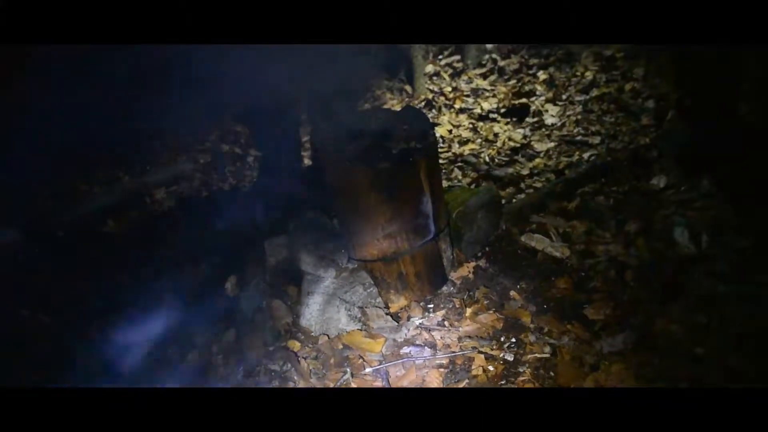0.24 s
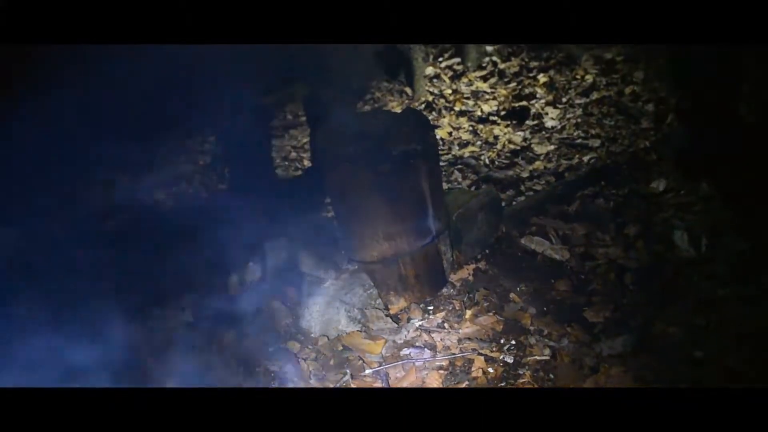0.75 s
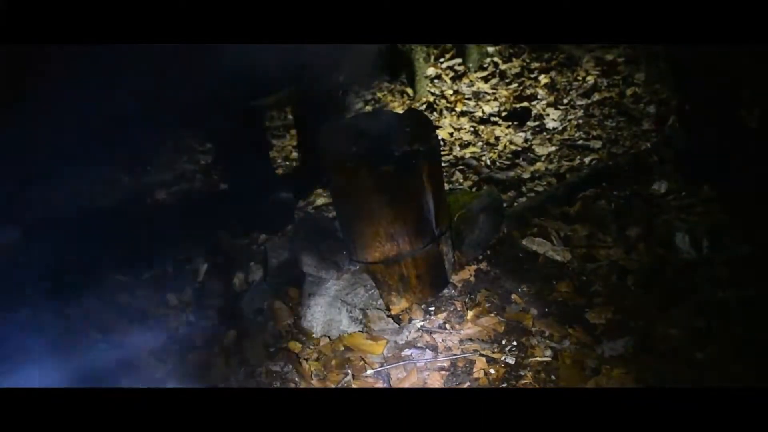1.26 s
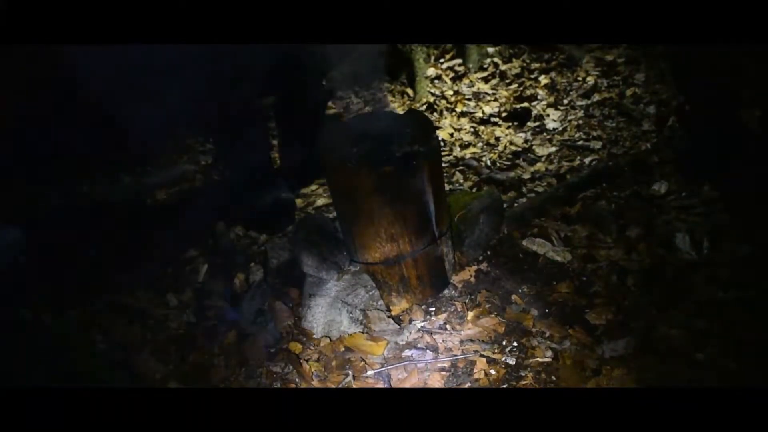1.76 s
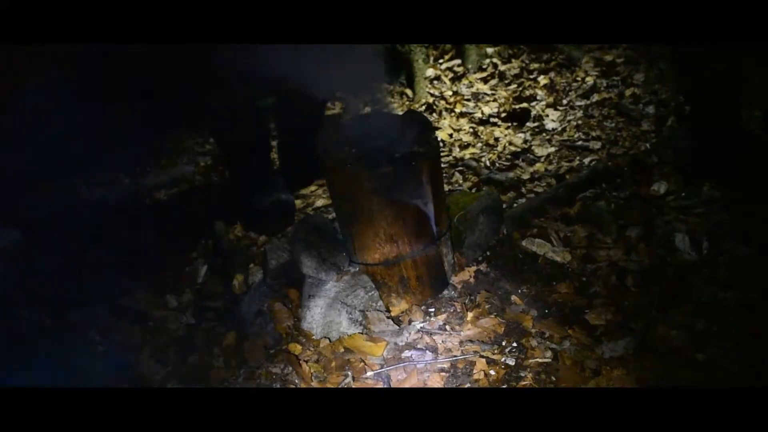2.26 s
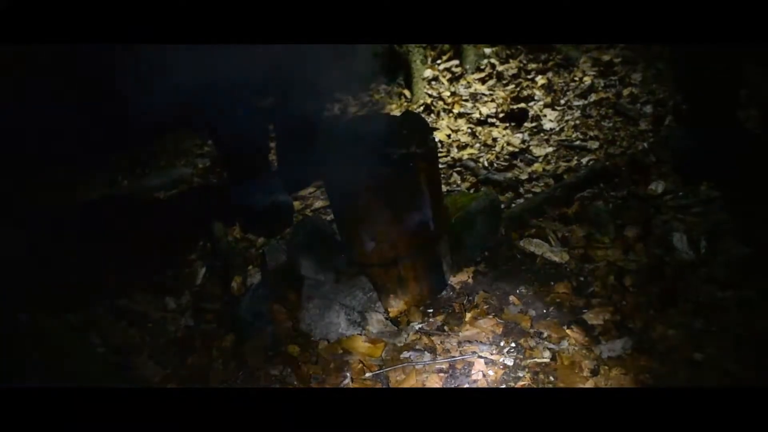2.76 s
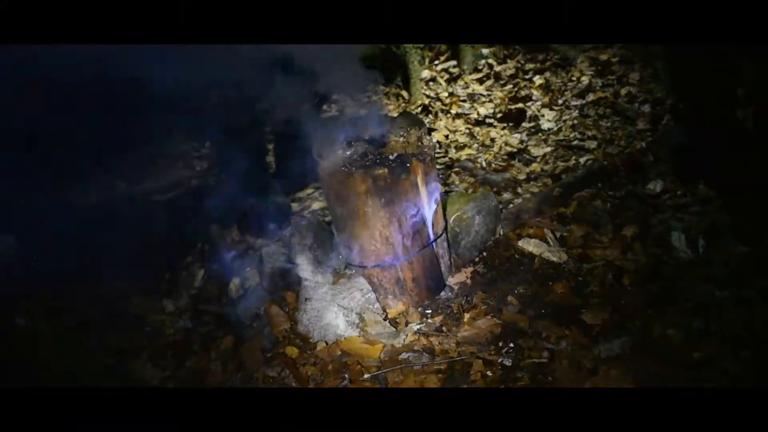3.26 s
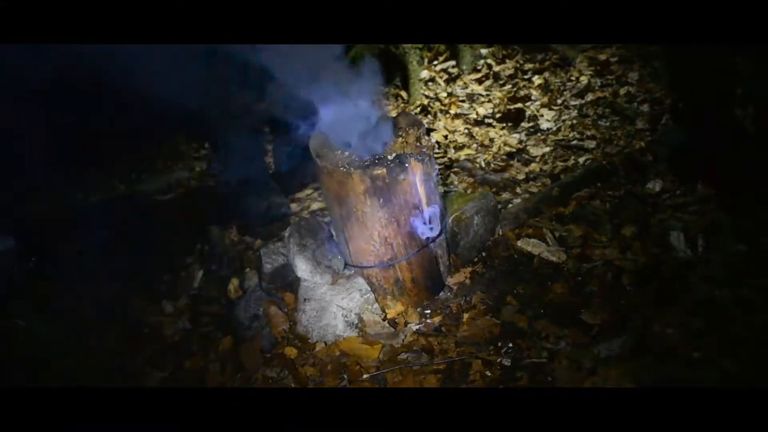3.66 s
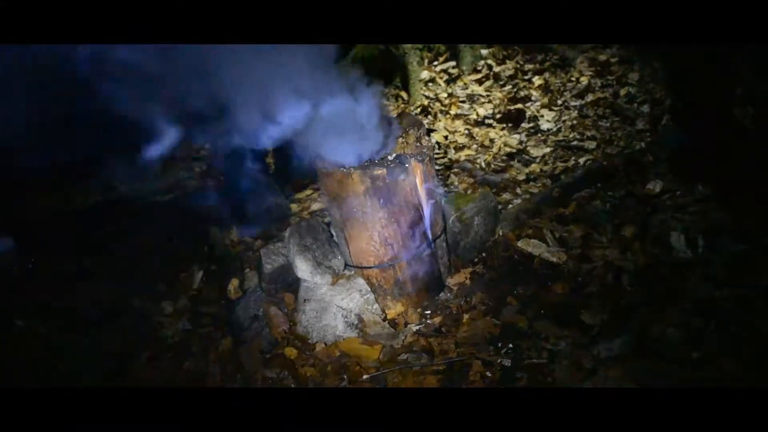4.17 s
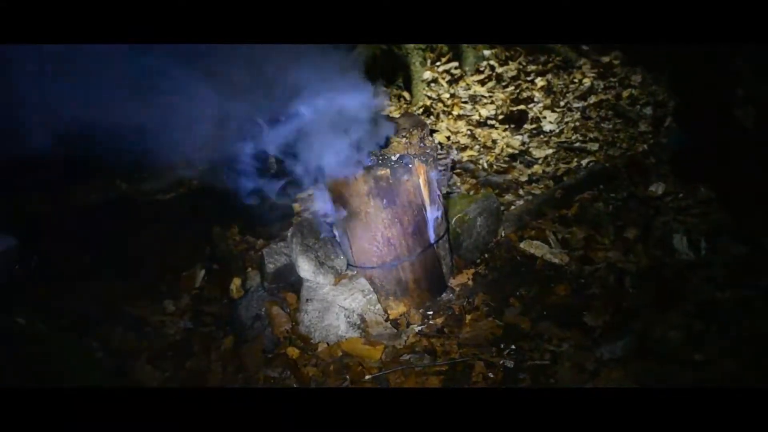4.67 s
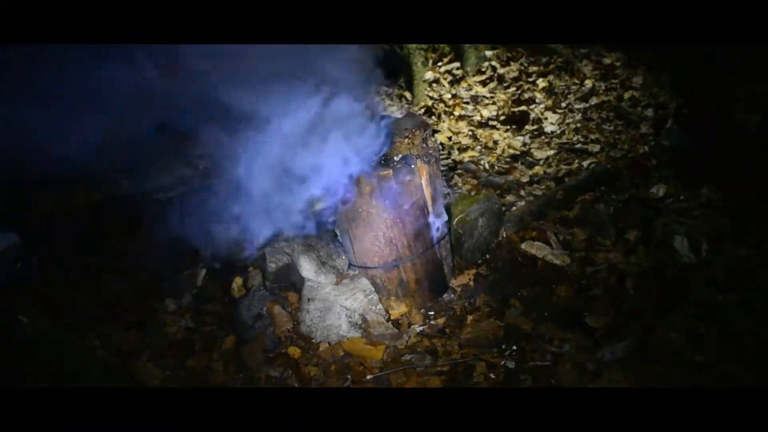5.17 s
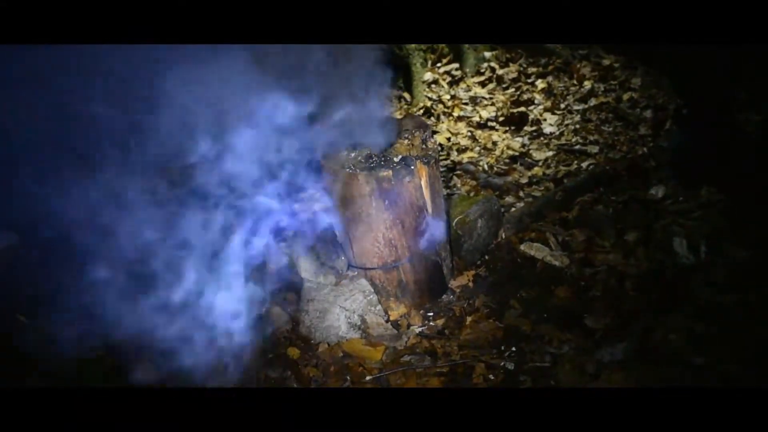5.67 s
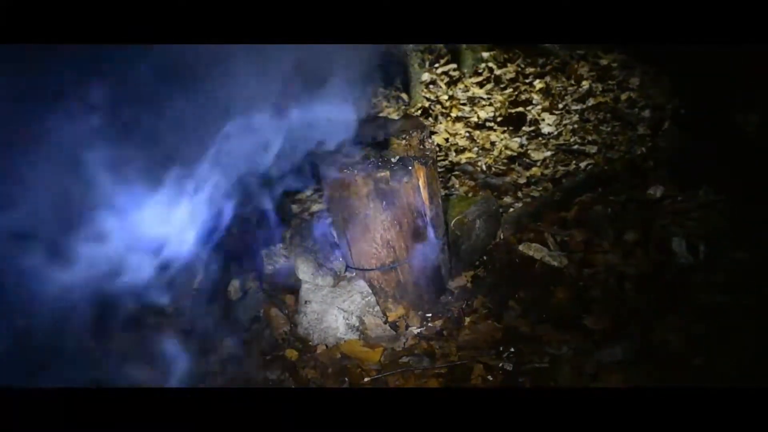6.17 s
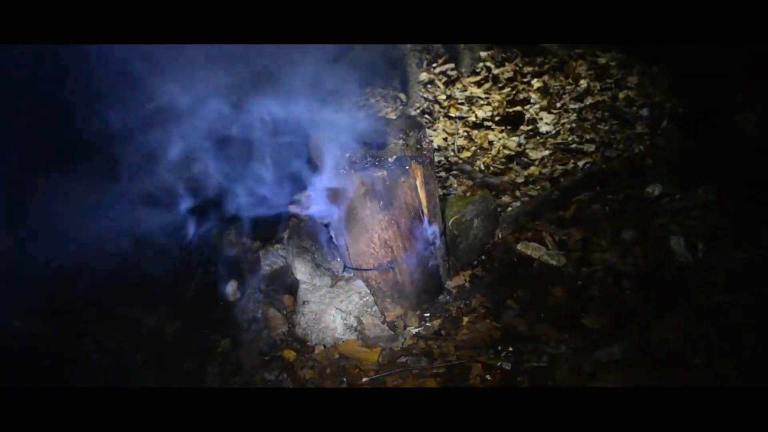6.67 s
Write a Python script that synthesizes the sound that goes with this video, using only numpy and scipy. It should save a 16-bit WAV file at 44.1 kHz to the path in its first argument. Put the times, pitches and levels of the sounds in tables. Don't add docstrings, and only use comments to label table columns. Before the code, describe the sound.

A damp log smoulders at night, very close, slightly left of centre in dry open air. Thin steam hiss and low ember flutter continue throughout, with quiet night air beneath. A small dull wet pop comes at 0.4 s, then a huge, bright, crackling burst at 1.04 s with tiny snaps trailing and a puff of hiss. After faint snaps around 1.3 s it calms. From 2.35 to 2.5 s a dense flurry of hollow woody crackles rings around mid pitch; a hard snap follows at 2.77 s. From 3 to 4.8 s only faint ticks, breathy whistling and gently swelling steam. At 4.99 s a short throbbing jet cracks open, then very sharp cracks at 5.19, 5.24 and 5.28 s, and a lighter one at 5.68 s. Fine ticks continue; crackles at 6.35 s and clustered bright pops from 6.47 to 6.9 s close it.

```python
import sys
import numpy as np
from scipy import signal
from scipy.io import wavfile
from scipy.ndimage import uniform_filter1d

SR = 44100
rng = np.random.default_rng(int(sys.argv[2]) if len(sys.argv) > 2 else 0)


def magnitude_from_level(level_db):
    exponent = np.asarray(level_db, float) / 20
    return 10 ** exponent


def waveform_to_disk(signal):
    frames = np.transpose(np.atleast_2d(signal))
    scaled = np.clip(frames, -1, 1) * 32767
    samples = np.round(scaled).astype(np.int16)
    wavfile.write(sys.argv[1], SR, samples)


N = 305337
LOG_PAN_DB = -1.42

ZONES_HZ = [300, 2200, 7000, 16500]


def rms_one(x):
    return x / np.sqrt(np.mean(x ** 2) + 1e-20)


def at_hz(points, hz):
    table_hz, table_db = np.transpose(points)
    return np.interp(np.log(hz), np.log(table_hz), table_db)


def drift(rate, size=N):
    knots = rng.standard_normal(4000)
    return np.interp(np.arange(size) * rate / SR, np.arange(len(knots)), knots)


def fade(t, dying_s):
    return magnitude_from_level(-60 * t / dying_s)


def band(x, low_hz, high_hz):
    sos = signal.butter(2, [low_hz, min(high_hz, .45 * SR)], "band", fs=SR, output="sos")
    return signal.sosfilt(sos, x)


def resonance(x, hz, width_hz):
    r = np.exp(-np.pi * width_hz / SR)
    feedback = [1, -2 * r * np.cos(2 * np.pi * hz / SR), r * r]
    return signal.lfilter([(1 - r * r) / 2, 0, (r * r - 1) / 2], feedback, x)


def twice_resonance(x, hz, width_hz):
    return resonance(resonance(x, hz, width_hz), hz, width_hz)


def panned(x, pan_db):
    return x * magnitude_from_level([[pan_db / 2], [-pan_db / 2]])


def pair(mid, side, alike, pan_db):
    own = np.sqrt(1 - alike) * side * [[1], [-1]]
    return panned(np.sqrt(alike) * mid + own, pan_db)


def gust(start, length, rise):
    u = np.clip((np.arange(N) / SR - start) / length, 0, 1)
    return np.sin(np.pi * u ** rise) ** 2


# start in seconds, snap level in dB, pocket pitch in Hz,
# dying time in ms, ring over the snap in dB.
BLASTS = [
    (1.0423, -5, 3200, 12.6, -27),
    (2.7667, -5, 6430, 10, -31),
    (2.767, -29, 1830, 9.5, -3),
    (5.1914, -6.5, 6500, 13, -7),
    (5.196, -15.5, 3740, 15, -9),
    (5.284, -9.5, 5470, 6.3, -18),
    (5.288, -16.5, 5200, 16.6, -5),
    (6.5961, -23.5, 6250, 9.1, -4),
    (6.641, -23, 3860, 9.4, -12),
]


def blasts():
    return [(s, hz, db + ring_db, db - 17, db, ms) for s, db, hz, ms, ring_db in BLASTS]


# start in seconds, snap level in dB, pocket pitch in Hz, dying time in ms.
SNAPS = [(1.056, -41.5, 5530, 8), (1.065, -38, 2970, 7), (1.0717, -25, 4690, 10), (1.0754, -32, 4570, 10),
         (1.08, -31, 6550, 14), (1.0887, -33, 5790, 22), (1.279, -27.5, 6300, 6), (1.3005, -30.5, 6800, 8),
         (2.3809, -23, 2070, 28), (2.3881, -18, 2500, 8.9), (2.5028, -33, 3520, 21),
         (2.7726, -16, 6500, 18), (2.7817, -22, 6740, 10), (2.788, -23, 5600, 7.4), (2.793, -32, 6960, 37),
         (3.355, -35.5, 1870, 7.1), (3.619, -28.5, 1770, 4.1), (5.2363, -21.5, 4490, 4),
         (5.24, -30, 2110, 33), (5.437, -37.5, 6480, 27), (5.4991, -37.5, 5750, 21),
         (5.6688, -40, 5470, 46), (5.684, -16.5, 6650, 3), (5.6865, -27.5, 7000, 13.3),
         (5.885, -52, 6500, 10), (6.861, -29.5, 2400, 10), (6.8648, -30, 4000, 7.1)]


def snaps():
    return [(s, hz, db - 14.5, db - 18.5, db, ms) for s, db, hz, ms in SNAPS]


# start in seconds, ring level in dB, pocket pitch in Hz, snap over the ring in dB.
POPS = [(0.4091, -35, 630, -0.5), (2.165, -53, 1680, -8), (2.345, -44, 900, -14), (2.376, -34, 2850, -4),
        (2.3963, -39.5, 3150, 0), (2.403, -37, 3180, -5), (2.421, -31, 2900, 9), (2.424, -23, 2810, 3.5),
        (2.441, -42, 2510, -6), (2.4482, -30.5, 2320, 1.5), (2.4717, -40, 2170, -16),
        (2.5333, -48.5, 2610, -5.5), (2.591, -41.5, 2210, -14), (2.6605, -40, 2600, -20),
        (2.775, -34, 6860, -10), (4.7716, -45, 4200, -1), (4.879, -43, 2780, -6), (5.519, -44.5, 1150, 3),
        (5.7064, -50.5, 1230, -15), (5.712, -48, 590, -20), (5.742, -51, 1290, -12),
        (6.4669, -32.5, 6300, -0.5), (6.488, -35, 6130, 1), (6.5458, -39, 1550, -6),
        (6.6146, -32, 4660, 4.5), (6.622, -39.5, 2280, -5), (6.7108, -30.5, 4060, -7.5),
        (6.866, -31, 1470, -13), (6.871, -36, 4670, -19), (6.8766, -34.5, 3500, -3.5)]


def wet_pops():
    return [(s, hz, db, db - 5.5, db + over_db, min(1000 * 67 / hz, 79)) for s, db, hz, over_db in POPS]


# start in seconds, bark level in dB, pocket pitch in Hz, dying time in ms.
CRACKS = [(0.4162, -30, 2820, 7), (2.022, -45.5, 1690, 19), (2.3694, -41, 1190, 16), (2.3716, -42, 655, 18),
          (2.4047, -31.5, 1780, 34), (2.4103, -39, 3220, 37), (2.417, -31, 2810, 140),
          (2.6528, -34, 2620, 21), (2.7519, -32, 1500, 9.6), (3.106, -46.5, 1145, 32),
          (3.1302, -45, 370, 34), (3.4486, -48, 3880, 20), (3.499, -47.5, 3730, 28),
          (3.5196, -45, 3830, 28), (3.6321, -46, 2620, 18), (4.8592, -43.5, 5840, 25),
          (4.899, -42.5, 3480, 14), (5.7846, -47, 3620, 18), (5.817, -37.5, 4030, 13),
          (6.0353, -40.5, 4520, 8.9), (6.3506, -53, 557, 22), (6.3648, -34.5, 1920, 22),
          (6.3687, -39, 2020, 56), (6.4417, -44.5, 6100, 18), (6.494, -36.5, 6640, 4.8),
          (6.5826, -47, 1720, 30), (6.834, -31.5, 4500, 6.3), (6.8512, -40, 6420, 9.1),
          (6.8965, -46, 5260, 34)]


def bark_cracks():
    return [(s, hz, db - 1.5, db, db + 3.5, ms) for s, db, hz, ms in CRACKS]


# start in seconds, ring level in dB, pocket pitch in Hz.
TICKS = [(1.136, -40, 7650), (1.39, -49.5, 1500), (2.377, -32, 2900), (2.422, -38, 433),
         (2.4247, -30, 2920), (2.417, -38, 2600), (2.504, -41, 3400), (2.55, -43, 1310),
         (2.6305, -41, 1760), (2.6479, -36, 1320), (3.614, -45, 1260), (4.865, -41.5, 2720),
         (4.8831, -60, 1490), (4.93, -48, 6500), (4.982, -44, 2800), (5.69, -46, 796), (5.724, -46.5, 450),
         (5.795, -51, 6200), (5.818, -39, 2620), (6.366, -52, 554), (6.588, -39, 4500), (6.5964, -37, 2400),
         (6.6176, -43, 6500), (6.7123, -60.5, 1340), (6.736, -49, 4200), (6.762, -50, 2400),
         (6.8413, -43, 4610), (6.8743, -39, 4840), (2.372, -32, 9000), (2.3767, -30, 8750),
         (2.39, -42, 11000), (2.4395, -43, 9500), (6.5951, -29.5, 8520), (6.618, -33, 6000),
         (6.512, -47, 6000), (6.828, -48, 2500), (6.351, -39, 1890), (6.691, -54, 2000),
         (5.197, -28.5, 9500), (4.94, -48, 7000), (4.89, -46, 7500)]


def ticks():
    return [(s, hz, db, db - 10, db - 2.5, 23) for s, db, hz in TICKS]


APART_DB = [-3.5, -0.5, 4.5]


def pops():
    events = blasts() + snaps() + wet_pops() + bark_cracks() + ticks()
    at, pocket_hz, pocket_db, bark_db, snap_db, dying_ms = np.transpose(events)[:, :, None]
    dying_s = dying_ms / 1000
    t = np.arange(2600) / SR
    mid, side = rng.standard_normal((2, len(at), len(t)))
    mid[:, 6] = 5

    emptied = np.maximum(t - .002 * magnitude_from_level(snap_db), 0)
    blast = (1 - np.exp(-t / .0001)) * fade(emptied, .002 + .12 * dying_s)

    knots = rng.standard_normal((len(at), 60))
    tearing = magnitude_from_level(2.5 * np.array([np.interp(t * 900, np.arange(60), row) for row in knots]))
    fibres = magnitude_from_level(-12) * fade(t, 2.5 * dying_s) + magnitude_from_level(-28) * fade(t, .05)
    fibres = fibres * tearing * (1 - np.exp(-t / 0.00064))
    sources = np.array([mid * (blast + fibres), side * (0.18 * blast + 0.312 * fibres)])

    pocket = np.stack([twice_resonance(sources[:, k] * fade(t, .06), hz, 250 + 0.23 * hz)
                       for k, hz in enumerate(pocket_hz[:, 0])], axis=1)
    bark = band(sources, 1000, ZONES_HZ[2])
    snap = band(band(sources, 6000, 15500), 5000, 19000)
    port = magnitude_from_level(4) * twice_resonance(snap, 9800, 5000)
    snap = magnitude_from_level(5.0 + 0.56 * snap_db) * snap + port

    parts = [(pocket, pocket_db, 50), (bark, bark_db + 3.0, 44), (snap, snap_db, 30)]
    shared, apart = 0, 0
    for ((m, d), db, size), apart_db in zip(parts, APART_DB):
        power = uniform_filter1d(m[:, :120] ** 2, size, axis=1)
        loudest = np.sqrt(power.max(axis=1, keepdims=True))
        shared = shared + magnitude_from_level(db) * m / loudest
        apart = apart + magnitude_from_level(db + apart_db) * d / loudest

    out = np.zeros((2, N + len(t)))
    for k, i in enumerate(np.round((at[:, 0] - .0003) * SR).astype(int)):
        out[:, i:i + len(t)] += shared[k] + apart[k] * np.array([[1], [-1]])
    return panned(out[:, :N], LOG_PAN_DB)


# start in seconds, pitch in Hz, peak in dB, dying time in ms.
RINGS = [(2.1625, 1730, -42, 40), (2.3765, 3150, -31, 31), (2.4166, 2880, -21, 18),
         (2.4218, 2950, -16.5, 25), (2.4465, 1940, -32, 30), (5.6838, 1330, -41.5, 30),
         (5.7048, 530, -38, 32), (5.7052, 1300, -41, 25), (6.3655, 2020, -30, 21), (6.547, 1550, -43, 24),
         (6.5958, 1930, -31, 16), (6.7103, 4750, -27, 15), (6.834, 4740, -28, 12.1),
         (6.8347, 1710, -32, 25), (6.8646, 1540, -25, 25), (3.4993, 3700, -46, 30), (3.52, 3850, -46, 30),
         (3.607, 1250, -47, 80), (1.0423, 424, -32, 10.1), (3.5, 1100, -41, 20), (2.421, 406, -40, 54),
         (6.367, 550, -45.5, 46), (4.988, 2790, -29, 17), (4.9883, 4070, -20, 15), (4.9884, 5700, -15, 9),
         (1.0424, 11100, -1.5, 9.1), (1.0485, 2550, -34, 28.5), (1.0424, 8936, -10, 10.9),
         (1.0445, 3200, -29, 20), (2.381, 2090, -31, 27), (2.4025, 3100, -30, 12)]


def rings():
    t, out = np.arange(4000) / SR, np.zeros(N + 4000)
    for s, hz, db, dying_ms in RINGS:
        i = int(s * SR)
        swell = 1 - np.exp(-t / 0.00027)
        note = np.sin(2 * np.pi * hz * t)
        out[i:i + len(t)] += magnitude_from_level(db) * fade(t, dying_ms / 1000) * swell * note
    return panned(out[:N], LOG_PAN_DB)


# start in seconds, noise level before
# the band-pass in dB, lowest pitch in Hz, dying time in ms.
SPARKS = [(1.043, -17, 14700, 7.1), (5.191, -11.5, 11500, 6.8), (5.195, -19, 9000, 20),
          (5.236, -6.5, 10000, 3.5), (5.283, -8, 5740, 8.1), (5.286, -13, 4300, 10), (5.684, -32, 9300, 4),
          (2.3695, -29, 1400, 12), (2.4225, -25, 3800, 14), (2.4245, -21, 4100, 14.5),
          (3.4479, -46, 1000, 5), (3.4993, -46, 700, 5), (4, -32, 1000, 7), (6.6407, -21.5, 1900, 15),
          (6.597, -30, 6000, 7.3), (6.8766, -38, 8000, 6), (1.065, -25, 10000, 4), (1.0718, -20, 11800, 5),
          (1.0888, -32, 10000, 4), (1.0435, -15.5, 11000, 18), (1.048, -22, 2500, 20),
          (2.776, -9, 7000, 5.4), (2.7812, -23, 8300, 8), (2.7882, -26, 10000, 4), (6.8648, -26, 3000, 5),
          (3.613, -42, 8000, 3), (2.6525, -32, 2800, 11), (6.865, -32, 2600, 8), (6.737, -42.5, 3000, 6),
          (6.582, -38, 3000, 6), (1.057, -35, 8000, 5), (1.0755, -26, 12000, 5), (1.0807, -28, 11000, 5),
          (5.191, -8.5, 1900, 2.5)]


def sparks():
    t, out = np.arange(1500) / SR, np.zeros((2, N + 1500))
    for s, db, low_hz, dying_ms in SPARKS:
        i = int(s * SR)
        noise = rng.standard_normal((2, len(t))) * fade(t, dying_ms / 1000)
        out[:, i:i + len(t)] += magnitude_from_level(db) * pair(*band(noise, low_hz, 15000), 0.9, LOG_PAN_DB)
    return out[:, :N]


# start in seconds, peak in dB, pitch in Hz.
CLICKS = [(1.0651, -21.0, 12500), (1.0719, -14.2, 12900), (1.0888, -23.7, 12800), (2.3721, -23.3, 8930),
          (2.381, -13.8, 8900), (2.3879, -8.3, 9910), (2.4046, -19, 4000), (2.4105, -22.8, 9000),
          (2.4393, -25.8, 9500), (2.6529, -28, 9500), (2.7513, -13, 3000), (2.7761, -9.5, 11200),
          (2.781, -14.9, 11000), (2.7882, -11, 11000), (3.4994, -33.5, 3830), (3.52, -33, 3860),
          (3.6195, -27, 5000), (6.4666, -14, 6400), (6.4938, -27, 10100), (6.5963, -9, 8400),
          (6.6148, -16.6, 7000), (6.6411, -11, 8500), (6.7104, -16, 4740), (6.8612, -23.8, 8510),
          (6.8771, -23.9, 5000)]


def clicks():
    step, out = np.eye(1, 300)[0], np.zeros(N + 300)
    for s, db, hz in CLICKS:
        i = int(s * SR)
        click = resonance(step, hz, 0.55 * hz)
        out[i:i + len(step)] += magnitude_from_level(db - 2) * click / np.abs(click).max()
    return panned(out[:N], LOG_PAN_DB)


# time in seconds, width in ms, peak in dB.
THUMPS = [
    (1.0425, 0.75, -22.5),
    (5.1914, 0.19, -10),
    (5.7055, 0.87, -37),
    (5.902, 2.9, -40),
]


def thumps():
    t = np.arange(N) / SR
    push = sum(magnitude_from_level(db) * np.exp(-.5 * ((t - s) / (width_ms / 4000)) ** 2) for s, width_ms, db in THUMPS)
    return band(push, 50.0, 9000)


# pitch in Hz, width in Hz, level in dB.
VENT = [(2000, 3100, -17), (3940, 900, -10.5), (5480, 510, 0.5), (6000, 314, -4), (8200, 230, -11.5)]
# seconds after the crack, level in dB.
VENT_THROB = [
    (0, 2),
    (.01, 1.5),
    (.014, -1),
    (.026, 1),
    (.047, -5),
    (.054, 0.5),
    (.066, 1.5),
    (.08, -2),
]


def vent():
    start_s, length_s = 4.9878, .08
    t = np.arange(N) / SR - start_s
    is_open = (t > 0) & (t < length_s)
    t = np.clip(t, 0, length_s)
    noise = rng.standard_normal((2, N))
    throb_db = np.interp(t, *np.transpose(VENT_THROB))
    jet = magnitude_from_level(-32 + throb_db - 35 * t + 3.4 * drift(450)) * np.sqrt(1 - t / length_s)
    crack = magnitude_from_level(-17) * fade(t, 0.0153) * (1 - np.exp(-t / 0.00045))
    ringing = rms_one(sum(magnitude_from_level(db) * twice_resonance(noise, hz, width_hz) for hz, width_hz, db in VENT))
    broad = rms_one(band(noise, 1800, 7500))
    sound = (jet + 1.33 * crack) * ringing + 0.34 * crack * broad
    return pair(*(is_open * sound), 0.8, pan_db=-6.5)


def crackle(per_s, spread_db):
    sizes = magnitude_from_level(spread_db * np.minimum(rng.exponential(1, N), 5)) * rng.choice([-1, 1], N)
    return rms_one(sizes * (rng.random(N) < per_s / SR))


def coloured(sources, colour, zone, patchy_db):
    edges = np.geomspace(ZONES_HZ[zone], ZONES_HZ[zone + 1], 5)
    total = 0
    for k, (low, high) in enumerate(zip(edges, edges[1:])):
        level_db = at_hz(colour, np.sqrt(low * high)) + patchy_db * drift(14)
        total = total + magnitude_from_level(level_db) * band(sources[k % 2], low, high)
    return total / np.std(total[0])


def blowing(start, length, first_db, last_db):
    t = np.arange(N) / SR - start
    gate = np.clip(np.minimum(t, length - t) / 0.057, 0, 1)
    return gate * magnitude_from_level(first_db + (last_db - first_db) * np.clip(t / length, 0, 1)) ** 2


# start in seconds, length in seconds, level on opening in dB,
# level on closing in dB, brightness in dB.
JETS = [(-.05, 0.68, -53, -61, 0.5), (0.562, 0.24, -61, -52.5, -1.5), (0.77, 0.288, -53, -52, 1),
        (1.066, 0.28, -44, -54.5, 1.5), (1.286, 0.18, -56.5, -58, -2.5), (1.958, 0.42, -60, -53, 2.5),
        (2.433, 0.23, -56, -53.5, -3), (2.66, 0.62, -54.5, -62, 2.5), (3.075, 0.61, -54, -55, -1.5),
        (3.956, 0.36, -59, -57.5, 1.5), (4.289, 0.19, -54, -44.5, 4.5), (4.455, 0.56, -47.5, -54, 2.5),
        (4.99, 0.38, -51, -47.5, 6), (5.314, 0.254, -56.5, -52, 2), (5.493, 0.19, -51.5, -46.5, 3.5),
        (5.66, 0.25, -54.5, -64.5, -6.5), (6.403, 0.3, -63, -53, 2), (6.798, 0.24, -71, -44, -3)]
# start in seconds, length in seconds, level in dB, brightness in dB.
SPUTTERS = [(0.109, 0.099, -54.5, 7), (0.395, 0.0407, -44, -4.5), (0.586, 0.13, -52.5, 1),
            (1.068, 0.016, -37.5, 9), (1.205, 0.14, -56, 10), (1.316, 0.15, -59, -1),
            (2.365, 0.047, -38.5, 1), (2.41, 0.034, -40, -9), (2.542, 0.026, -57.5, -12),
            (2.571, 0.087, -51.5, 0), (2.624, 0.05, -44.5, -8), (2.769, 0.1, -52, 6),
            (4.122, 0.025, -60, 7.5), (4.347, 0.108, -50, 1.5), (4.44, 0.024, -44.5, 2.5),
            (5.288, 0.07, -46, 5.5), (5.692, 0.038, -66, -8), (5.877, 0.018, -61, 6),
            (6.342, 0.047, -40.5, 6), (6.576, 0.041, -47, 4), (6.848, 0.039, -43, -1),
            (2.442, 0.023, -42, -4), (2.466, 0.025, -50, -4.5)]
# pitch in Hz, level in dB per Hz.
HISS = [(250, -6.5), (450, -5), (700, -4), (1200, -2), (2200, -2.5), (4500, -6), (7000, -3.5), (9800, 0.5),
        (13000, -6), (16500, -17)]
# pitch in Hz, level in dB per Hz.
SPIT = [(250, -65), (500, -2), (1000, 2.5), (1700, 3.5), (3000, 18), (5000, 12.5), (7000, 0), (9800, 6),
        (13000, -2), (16500, -15.5)]
SPUTTER_ZONE_DB = [-0.84, 2, 1.5]


def steam():
    jet_noise = rng.standard_normal((2, 2, N)) + 0.58 * crackle(per_s=540, spread_db=2.0)
    spit_noise = .6 * rng.standard_normal((2, 2, N)) + crackle(per_s=2500, spread_db=3.5)
    spit_noise = spit_noise * magnitude_from_level(3 * drift(250))
    jets = np.array([blowing(*row[:4]) for row in JETS])
    swells = np.array([gust(start, length, rise=0.76) for start, length, *_ in SPUTTERS])
    _, _, first_db, last_db, jet_bright_db = np.transpose(JETS)
    _, _, gust_db, gust_bright_db = np.transpose(SPUTTERS)
    over_usual_db = np.maximum(first_db, last_db) + 50.5
    flutter = magnitude_from_level(1.0 * drift(25) + 1.42 * drift(90))

    simmer_db, jet_db, fill = [-61.5, -63, -60.5], [-2, -1.5, -1.1], [.01, 0.31, -0.042]
    out = 0
    for zone, alike in enumerate([.97, .95, .9]):
        lean = zone - 1
        gain_db = jet_db[zone] + fill[zone] * over_usual_db + lean * jet_bright_db
        level = np.sqrt(magnitude_from_level(simmer_db[zone]) ** 2 + magnitude_from_level(gain_db) ** 2 @ jets)
        hiss = coloured(jet_noise, HISS, zone, patchy_db=1.5)
        out = out + level * flutter * pair(*hiss, alike, LOG_PAN_DB)
        gusts = magnitude_from_level(SPUTTER_ZONE_DB[zone] + gust_db + lean * gust_bright_db) @ swells
        spit = coloured(spit_noise, SPIT, zone, patchy_db=4.5)
        out = out + gusts * pair(*spit, alike, LOG_PAN_DB)
    return out


# start in seconds, length in seconds, pitch in Hz, width in Hz, level in dB.
WHISTLES = [
    (0.43, 0.48, 1165, 140, -59.5),
    (3.16, 0.61, 4940, 400, -62.5),
    (3.62, 0.024, 2550, 300, -49.5),
    (3.3, 0.57, 2370, 900, -61),
]
# start in seconds, length in seconds, pitch in
# Hz, width in Hz, level in dB.
FAINT_WHISTLES = [
    (0.76, 0.33, 1200, 107, -62.5),
    (1.05, 0.3, 1200, 200, -60),
    (5.9, 0.53, 1260, 142, -67),
    (0.9, 3, 5070, 80, -75),
]


def whistles(pores):
    out = 0
    for start, length, hz, width_hz, db in pores:
        tone = rms_one(twice_resonance(rng.standard_normal((2, N)), hz, width_hz))
        swell = np.sqrt(gust(start, length, rise=0.64))
        out = out + magnitude_from_level(db) * swell * pair(*tone, 1.0, LOG_PAN_DB)
    return out


# time in seconds, level in dB.
EMBERS = [(0, 3.5), (4.9, 3), (5.5, 7.5), (6.2, 4), (6.92, 4.5)]
# pitch in Hz, level in dB per Hz.
NIGHT = [(15, -30), (25, -9.5), (135, -1.5), (358, -8), (509, -8), (668, -11), (1250, -13), (2330, -17),
         (4010, -11.5), (6900, -20), (7900, -14), (14700, -18), (16400, -57)]
# pitch in Hz, likeness from -1 to 1.
NIGHT_ALIKE = [(60, 1), (180, 1), (550, 0.476), (1650, 0.47), (4970, 0.17), (15000, 0.1)]


def night():
    out = 0
    edges = 26 * 2 ** np.arange(0, 9.6, .5)
    white = rng.standard_normal((2, 2, N))
    embers_db = np.interp(np.arange(N) / SR, *np.transpose(EMBERS)) + 1.28 * drift(8.3)
    for k, (low, high) in enumerate(zip(edges, edges[1:])):
        mid, side = band(white[k % 2], low, high)
        hz = min(np.sqrt(low * high), 14500)
        alike = np.clip(.5 + .5 * at_hz(NIGHT_ALIKE, hz), 0, .965)
        lows = np.clip((380 - hz) / 240, 0, 1)
        level_db = at_hz(NIGHT, hz) + (1.0 + 0.95 * lows) * drift(9.7) + embers_db * lows
        out = out + magnitude_from_level(level_db) * pair(mid, side, alike, pan_db=-0.5)
    return magnitude_from_level(-55.5) * rms_one(out)


def scene():
    background = night()
    steaming = steam() + whistles(WHISTLES)
    bursting = vent() + thumps() + pops() + rings() + sparks() + clicks()
    return background + steaming + bursting + whistles(FAINT_WHISTLES)


def roll_off(x):
    return signal.sosfilt(signal.butter(12, 15790, fs=SR, output="sos"), x)


def record(dry):
    top_cut = signal.butter(10, 16100, fs=SR, output="sos")
    mix = signal.sosfilt(top_cut, np.clip(dry, -.98, .98))
    return roll_off(mix)


dry = scene()
out = record(dry)
waveform_to_disk(out)
```